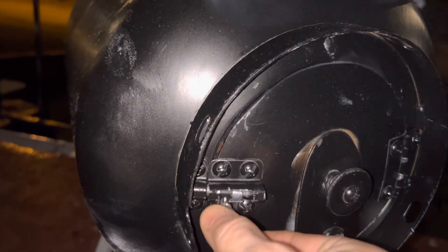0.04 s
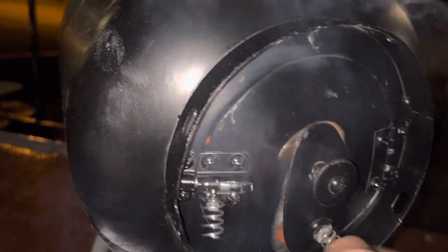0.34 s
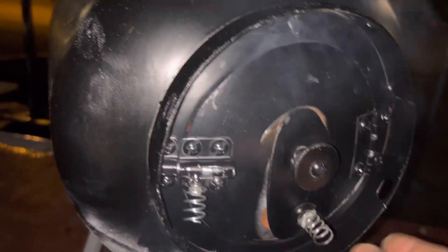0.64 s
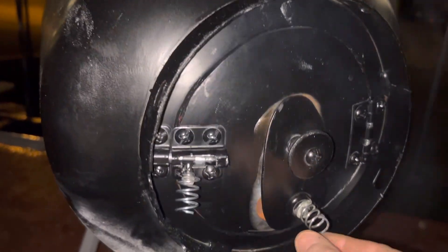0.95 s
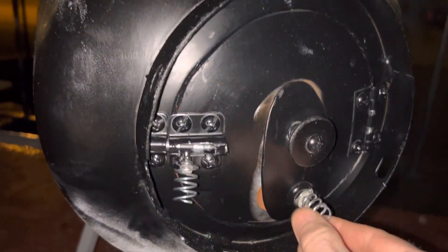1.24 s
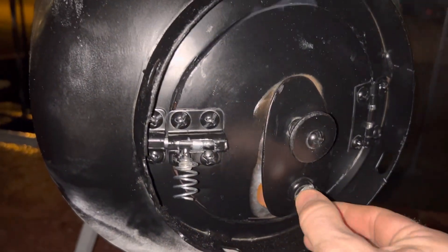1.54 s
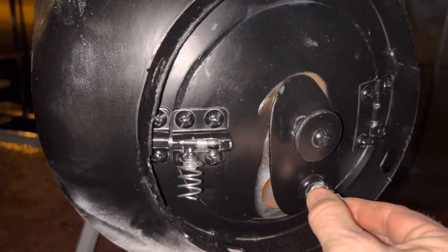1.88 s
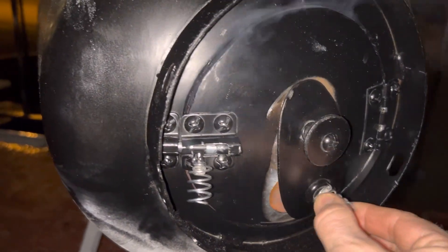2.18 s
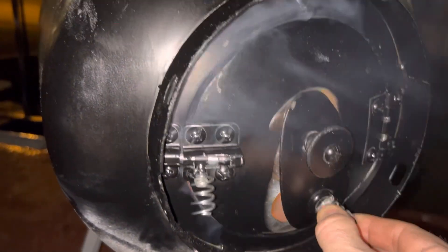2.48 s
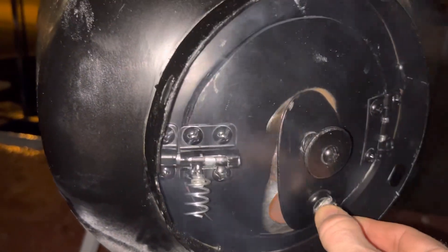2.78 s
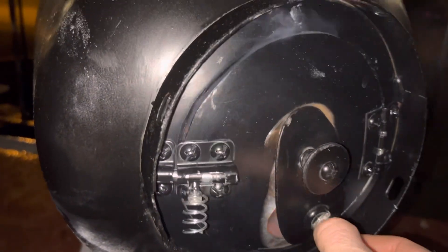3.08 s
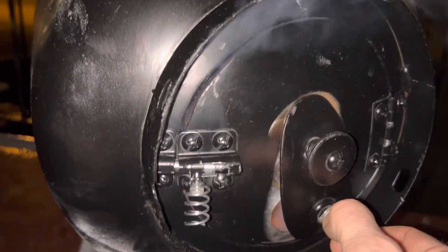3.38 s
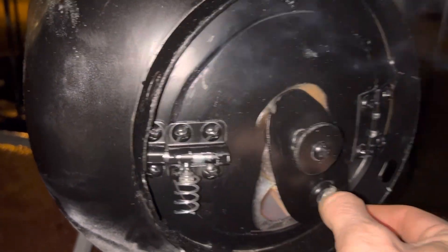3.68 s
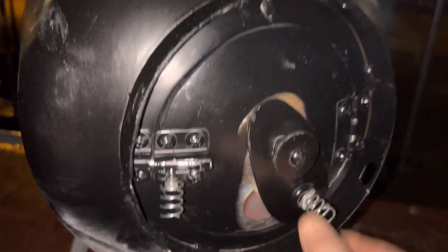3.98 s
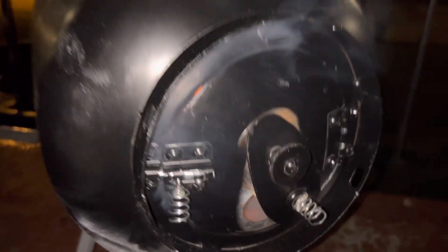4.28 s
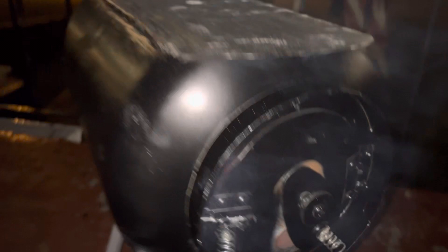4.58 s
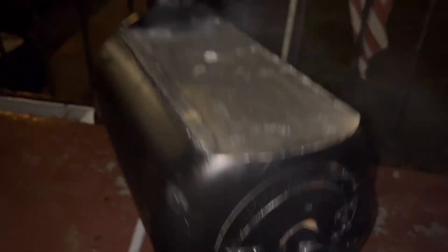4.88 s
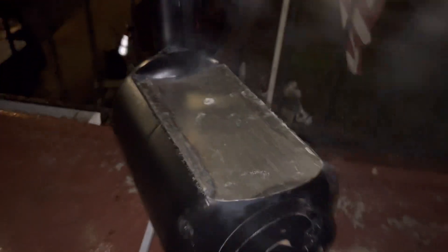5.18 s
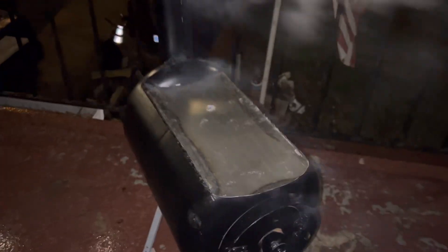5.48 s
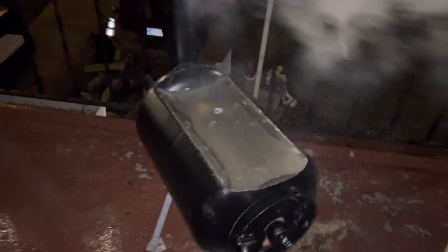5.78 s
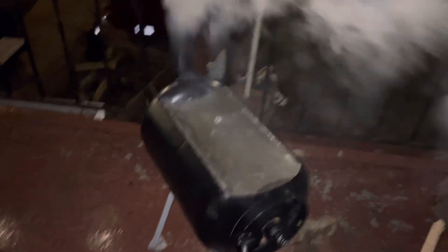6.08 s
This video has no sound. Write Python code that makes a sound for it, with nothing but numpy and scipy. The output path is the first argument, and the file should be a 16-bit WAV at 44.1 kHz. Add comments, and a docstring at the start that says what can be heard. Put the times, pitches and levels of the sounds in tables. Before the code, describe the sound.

Steel latch and vent plate click, knock and scrape on a small stove over a low fire rumble, then gusts buffet the microphone.

```python
"""Latch and vent of a small steel stove

Close to the door, in stereo: a hand works the latch, spring handles and swivelling vent plate, and the steel
rings as they knock, click and scrape. A deep rumble, dropping out now and then, lies under them over a steady
flue roar. Then the microphone is carried back past the hissing stove, with small ticks and rustles of handling,
and gusts of air buffet it."""
import sys
import numpy as np
from scipy import signal
from scipy.fft import rfft, irfft, next_fast_len
from scipy.io import wavfile

SR = 44100
rng = np.random.default_rng(int(sys.argv[2]) if len(sys.argv) > 2 else 0)


def master(y):
    """Save y as 16-bit WAV."""
    cut = np.clip(np.atleast_2d(y).T, -1, 1)
    pcm = np.round(cut * 32767)  # scale
    wavfile.write(sys.argv[1], SR, pcm.astype(np.int16))


N = 275184
TIME = np.arange(N) / SR


def knocks(door, low_db, middle_db, top_db, grip_s, note_t60, ping_t60):
    """Latch and vent plate knock home and chatter on the door; the hand damps the ring."""
    # blows on the door: (time [s], middle [dB], low [dB], top [dB], door's note [Hz], note [dB],
    # striking part's ping [Hz], ping [dB], attack [ms])
    blows = [(1.4737, -80, -37, -85, 827, -45.5, 3060, -63, 0.84),
             (1.8574, -24, -33, -54.5, 1530, -34, 4900, -55, 0.34),
             (1.863, -48, -35, -70, 1047, -29.5, 4400, -57, 0.47),
             (1.872, -31, -29.5, -41, 1070, -58, 7140, -56, 1.2),
             (2.2552, -36.5, -32.5, -66, 910, -42, 3000, -69, 0.75),
             (2.9554, -43, -33.5, -66, 656, -53.5, 3700, -56, 1),
             (3.0175, -43.5, -29, -75, 1063, -34.5, 3180, -45.5, 0.39),
             (3.437, -41.5, -30, -66, 765, -30, 1770, -40, 1.3),
             (3.656, -43, -36, -72, 932, -48.5, 4330, -46, 0.59),
             (3.759, -39.5, -48, -47, 650, -60, 7150, -43, 2.8),
             (3.7717, -39, -45, -59, 2010, -54, 3480, -45, 3),
             (3.8262, -36, -49, -51.5, 654, -43, 2670, -46, 2.8)]
    out, t = np.zeros(N), TIME[:SR // 3]
    for s, middle, low, top, note_hz, note_db, ping_hz, ping_db, attack_ms in blows:
        register_db = (low + low_db, middle + middle_db, top + top_db)
        ring = clang(door, register_db, scatter_db=4.0, spots_hz=(note_hz, ping_hz), spot_db=5.5)
        ring = signal.fftconvolve(ring, chatter(t))[:len(t)]
        note, ping = (note_hz, note_db, note_t60), (ping_hz, ping_db, ping_t60)
        rocking = (64.5, low + 2.5, 0.072)   # the whole stove rocks
        for hz, db, t60 in note, ping, rocking:
            ring = ring + from_db(db - 60 * t / t60) * np.sin(2 * np.pi * hz * t)
        attack = 1 - np.exp(-1000 * t / attack_ms)
        add(out, s, ring * attack * np.exp(-t / grip_s))
    return out


def chatter(t, bounces_per_s=760, bounce_db=-24.5, t60=0.057):
    """A blow followed by a dying spray of tiny bounces."""
    bounces = (rng.random(len(t)) < bounces_per_s / SR) * rng.standard_normal(len(t))
    return (t == 0) + bounces * from_db(bounce_db - 60 * t / t60)


def clicks(door, low_db, middle_db, top_db, attack_s, grip_s):
    """The spring handles tap the door, each time at another spot, and the fingers soon still them."""
    # light touches: (time [s], middle [dB], top [dB], favoured pitch [Hz])
    touches = [(0.0796, -38, -59, 1900), (0.186, -63, -55, 2990), (0.238, -39, -46, 8200),
               (0.3453, -41.5, -54, 8000), (0.3568, -39, -46.5, 4200), (0.3934, -45.5, -53.5, 3300),
               (1.3852, -38.5, -57.5, 2660), (1.487, -53.5, -61, 7200), (1.5537, -52, -68, 6900),
               (1.61, -50, -66, 5500), (1.8326, -48, -58.5, 3220), (2.1293, -46.5, -57, 3230),
               (2.9133, -40.5, -59, 2610), (3.024, -54, -57, 2870), (3.1776, -56.5, -58.5, 2590),
               (3.52, -59, -70, 7500), (3.707, -60, -73, 7400), (3.87, -60, -63, 8200),
               (4.004, -50.5, -66, 2700), (4.262, -54, -79, 5230)]
    usual_touch_db = -51.5
    out, t = np.zeros(N), TIME[:SR // 3]
    for s, middle, top, spot_hz in touches:
        low = -43 + 0.4 * (middle - usual_touch_db)   # a harder touch stirs the low ring only a little
        register_db = (low + low_db, middle + middle_db, top + top_db)
        ring = clang(door, register_db, scatter_db=3.5, spots_hz=[spot_hz], spot_db=8.5)
        add(out, s, ring * (1 - np.exp(-t / attack_s)) * np.exp(-t / grip_s))
    return out


def scrapes(door):
    """The vent plate and the handles grind over the door."""
    # steel on steel: (start [s], end [s], low [dB], middle [dB], top [dB], squeak [Hz])
    strokes = [(0.233, 0.283, -43, -62.5, -58, 3800), (0.242, 0.333, -49, -71, -66, 1110),
               (1.636, 1.705, -53, -58.5, -60.5, 3400), (2.14, 2.18, -47, -64.5, -78, 2380),
               (2.256, 2.334, -45, -61, -70, 7700), (2.41, 2.45, -46.5, -61.5, -65.5, 2330),
               (2.547, 2.595, -58, -76, -79, 3700), (2.941, 3.008, -46.5, -61, -75, 7000),
               (3.012, 3.075, -45.5, -66, -67, 3900), (3.125, 3.182, -44.5, -73, -66, 2400),
               (3.55, 3.586, -49.5, -61, -60, 4260), (3.577, 3.639, -50, -56, -56.5, 4140),
               (3.752, 3.782, -69, -50, -59, 8200), (3.763, 3.806, -45.5, -53, -66, 3400),
               (3.819, 3.845, -43.5, -53, -61, 2740), (3.833, 3.885, -53, -68, -71, 5100)]
    return rub(door, strokes, slips_per_s=800, uneven_db=3.5, level_db=-36.5, fade=1.0, squeak_db=9)


def spring(split=0.0143):
    """The handle's freed coil rings on in close pairs of modes that beat as they die away."""
    # the fingers let go: (time [s], level [dB])
    releases = [(3.824, 11), (4.2607, -10.5)]
    # ringing of the coil: (pitch [Hz], level [dB], t60 [s])
    coil_modes = [(2410, -67, 0.11), (3450, -75, .2), (4030, -78, 0.36), (5055, -60.5, 0.12),
                  (6800, -55, 0.089), (7300, -66, 0.15)]
    out, t = np.zeros(N), TIME[:SR]
    for s, db in releases:
        for hz, mode_db, t60 in coil_modes:
            pair_hz = hz * (1 + split * np.array([[-.5], [.5]]) * rng.uniform(.5, 1.86))
            beating = np.sin(2 * np.pi * pair_hz * t).sum(0)
            add(out, s, from_db(db + mode_db - 60 * t / t60) * beating)
    return out


def plate(dense_t60, long_modes, count=420):
    """Pitches and ringing of a body: any long modes plus dense short ones, dying in dense_t60 at 4 kHz."""
    # how well the dense modes radiate: (frequency [Hz], level [dB])
    radiation = [(450, -15), (1050, -13), (2000, -10), (2700, -11.5), (3400, -7.5), (4400, -4), (5700, -6),
                 (7200, -3.5), (10000, -2.5), (14000, 0.5), (16000, -12)]
    spread = (np.arange(count) + rng.random(count)) / count
    dense_hz = 450 + 15500 * spread ** 1.5
    dense_modes = np.c_[dense_hz, at_hz(radiation, dense_hz), dense_t60 * (dense_hz / 4000) ** -.42]
    hz, db, t60 = np.vstack([dense_modes, *long_modes]).T[:, :, None]
    t = TIME[:SR // 3]
    return hz[:, 0], from_db(db - 60 * t / t60) * np.sin(2 * np.pi * hz * t)


def clang(body, register_db, scatter_db, spots_hz=(), spot_db=0, spot_octaves=0.28):
    """One touch: its hardness sets each register's level, its spot lifts the modes near some pitches."""
    # centres of the registers: (low [Hz], middle [Hz], top [Hz])
    register_hz = [1300, 4500, 12500]
    hz, rings = body
    level_db = at_hz(list(zip(register_hz, register_db)), hz) + scatter_db * rng.standard_normal(len(hz))
    for spot_hz in spots_hz:
        level_db = level_db + spot_db * np.exp(-(np.log2(hz / spot_hz) / spot_octaves) ** 2)
    return (from_db(level_db) * rng.choice([-1, 1], len(hz))) @ rings


def rub(body, strokes, slips_per_s, uneven_db, level_db, fade, squeak_db=0, places=2):
    """Stick and slip: a run of tiny blows swells and eases, its ring changing as the contact travels."""
    out = np.zeros(N)
    slipping = rng.random(N) < slips_per_s / SR
    strength = from_db(uneven_db * np.clip(rng.standard_normal(N), -2, 2))
    slips = slipping * strength * rng.choice([-1, 1], N)
    for start, end, low, middle, top, *squeak_hz in strokes:
        run = slips[round(start * SR):round(end * SR)]
        along = np.linspace(0, 1, len(run))
        run = rms_one(run * np.sqrt(along * (1 - along)) * np.exp(-fade * along))
        place = np.clip((along * places + rng.standard_normal(len(run))).astype(int), 0, places - 1)
        for k in range(places):
            ring = clang(body, (low, middle, top), scatter_db=2.5,
                         spots_hz=squeak_hz, spot_db=squeak_db, spot_octaves=0.081)
            add(out, start, signal.fftconvolve(run * (place == k), ring))
    return from_db(level_db) * out


def ticks(body, low_db, middle_db, top_db):
    """Dry ticks of handling, with hardly any ring, as the microphone is carried back."""
    # small taps: (time [s], middle [dB], low [dB], top [dB], favoured pitch [Hz])
    taps = [(4.6899, -34.5, -45, -53.5, 6800), (4.8087, -51, -46, -62, 5000), (4.823, -55, -51, -71, 6030),
            (4.842, -47, -50, -68, 6060), (4.9267, -44, -44.5, -41, 7560), (5.019, -47, -53, -60, 2400),
            (5.1711, -23, -41, -57, 2900), (5.1826, -22.5, -36, -74, 1360), (5.456, -25, -31, -57.5, 865),
            (5.474, -39, -29.5, -64.5, 2390), (5.7002, -37, -37.5, -59, 3630),
            (6.005, -47.5, -61, -60, 3870)]
    out = np.zeros(N)
    for s, middle, low, top, spot_hz in taps:
        register_db = (low + low_db, middle + middle_db, top + top_db)
        add(out, s, clang(body, register_db, scatter_db=1.5, spots_hz=[spot_hz], spot_db=5.0))
    return out


def rustles(body, low_lift_db=11.5):
    """Fingers and clothing brush past in gritty, dry slips."""
    # brushing strokes: (start [s], end [s], middle [dB], top [dB], favoured pitch [Hz])
    brushes = [(1.077, 1.36, -80.5, -86.5, 12300), (4.957, 5.184, -66, -85, 2346),
               (5.153, 5.201, -58.5, -64, 3800), (5.201, 5.24, -60, -63, 4470),
               (5.217, 5.505, -69, -98, 4130), (5.391, 5.434, -58.5, -52, 7300),
               (5.672, 5.735, -69, -66, 4030)]
    strokes = [(start, end, middle + low_lift_db, middle, top, hz)
               for start, end, middle, top, hz in brushes]
    return rub(body, strokes, slips_per_s=1200, uneven_db=0.0, level_db=-31.5, fade=0.073, squeak_db=10)


def crackle(body, start_s=4.7, end_s=5.48):
    """Sparse tiny snaps among the rustles."""
    stroke = (start_s, end_s, -68.5, -68.5, -91)   # even low and middle, weak top
    return rub(body, [stroke], slips_per_s=66, uneven_db=5, level_db=-31, fade=0)


def thumps(level_db, churn_db, rise_cycles=0.38, fall_cycles=0.86, sag_octaves=0.49):
    """Each push of air is a short low swing that sinks in pitch; quicker ones churn up a rough edge."""
    # pushes at the stove, then on the microphone: (time [s], level [dB], centre pitch [Hz])
    pushes = [(.004, -24.5, 74.4), (0.199, -24, 78), (0.479, -23.5, 63), (1.293, -23.5, 90),
              (2.227, -26, 95), (2.478, -23, 84), (3.034, -25, 124), (3.317, -22, 79.5), (3.404, -22, 150),
              (3.416, -20, 192), (3.422, -12, 104), (3.449, -18, 68.5), (5.481, -22, 170),
              (5.526, -18, 172), (5.571, -15, 335), (5.582, -9, 125), (5.63, -10.5, 117),
              (5.687, -13.5, 117), (5.728, -10.5, 232), (5.771, -22, 137), (5.826, -25.5, 407),
              (5.994, -30.5, 400), (6.032, -43.5, 330), (6.186, -41, 540), (6.208, -41.5, 540)]
    # spectrum of the rough edge: (frequency [Hz], density [dB])
    churn_colour = [(100, -36), (200, 9.5), (380, -2.5), (520, -14), (750, -16.5), (1500, -66.5)]
    swing, force = np.zeros(N), np.zeros(N)
    for s, db, hz in pushes:
        near = np.abs(TIME - s) < .1
        cycles = (TIME[near] - s) * hz
        push = from_db(db) * 2 / (np.exp(-cycles / rise_cycles) + np.exp(cycles / fall_cycles))
        turns = np.cumsum(hz * 2 ** (-sag_octaves * np.tanh(cycles))) / SR
        swing[near] += push * np.sin(2 * np.pi * (turns - np.interp(0, cycles, turns)))
        force[near] += push * min(hz / 150, 1) ** 2
    churn = force * stereo_noise(churn_colour, waver_db=1.5, waver_hz=79)
    churn = signal.sosfilt(signal.butter(4, 172, "high", fs=SR, output="sos"), churn)
    return from_db(level_db) * swing + from_db(churn_db) * churn


def buffeting():
    """Air hits the moving microphone in separate lumpy gusts."""
    # gusts: (time [s], half-length [s], level [dB])
    gusts = [(5.486, 0.031, -29.5), (5.543, 0.012, -30), (5.589, 0.014, -23), (5.629, 0.015, -23),
             (5.687, 0.022, -23), (5.745, 0.02, -23)]
    # spectrum of wind on the microphone: (frequency [Hz], density [dB])
    colour = [(28, -36), (50, -6), (80, -6), (120, -0.5), (180, -2), (250, -7.5), (380, -16), (520, -26.5),
              (900, -50.5)]
    force = sum(from_db(db) * np.exp(-((TIME - s) / half_s) ** 2 / 2) for s, half_s, db in gusts)
    return force * stereo_noise(colour, waver_db=1.5, waver_hz=70)


def rumble(thin_below_db=-65, bass_hz=103, leave_s=5.76, fall_db_per_s=216):
    """The deep rumble and flutter thin out together at times and die away near the end."""
    # course of the deep rumble, an early and a late list: (time [s], level [dB])
    deep_levels = [
        [(0.0, -47.5), (0.52, -43.5), (0.69, -57), (1.48, -41), (1.58, -46.5), (2.22, -50.5), (2.4, -44),
         (2.8, -52), (3.12, -49)],
        [(3.62, -46), (3.698, -55), (3.822, -50), (3.916, -105), (4.204, -61), (4.362, -70), (4.72, -48.5),
         (5.186, -82.5), (5.4, -71)],
    ]
    # course of the flutter: (time [s], level [dB])
    flutter_levels = [(0.0, -42.5), (0.31, -41), (0.94, -43), (2.95, -42), (3.28, -38), (3.64, -39.5),
                      (3.89, -44), (4.13, -43), (4.34, -43), (4.8, -40), (5.14, -43.5), (5.35, -39.5)]
    # spectra of rumble and flutter: (frequency [Hz], density [dB])
    deep_colour = [(22, -19.5), (35, -20.5), (52, 1), (70, -4), (95, -7), (150, -49.5)]
    flutter_colour = [(28, -50.5), (50, -28.5), (70, 1.5), (105, 2), (150, -5), (240, -10.5), (350, -25.5),
                      (500, -28), (900, -57.5)]
    deep_db, flutter_db = in_time(np.vstack(deep_levels)), in_time(flutter_levels)
    deep = from_db(deep_db + 8.0) * stereo_noise(deep_colour, waver_db=4.5, waver_hz=11)
    flutter = from_db(flutter_db + 2.0) * stereo_noise(flutter_colour, waver_db=2.0, waver_hz=26)
    # when the rumble sinks far enough, the flutter loses its bass as well
    bass = signal.sosfiltfilt(signal.butter(4, bass_hz, fs=SR, output="sos"), flutter)
    flutter = flutter - bass + bass * from_db(np.minimum(deep_db - thin_below_db, 0))
    return (deep + flutter) * from_db(-fall_db_per_s * np.maximum(TIME - leave_s, 0))


def flue_roar(level_db=-53.5):
    """The steady roar of the flue and surroundings, a little to the left."""
    # spectrum of the roar: (frequency [Hz], density [dB])
    colour = [(70, -56.5), (140, -43), (210, 5), (330, 6.5), (520, 1), (850, 3), (1300, -5.5),
              (1750, -10.5), (2400, -23.5), (4000, -36.5), (7000, -51.5), (15000, -56.5)]
    return from_db(level_db) * stereo_noise(colour, waver_db=0.5, waver_hz=28) * from_db([[1.0], [-1.0]])


def hiss(usual_db=-69.5, treble_db_per_db=0.6, treble_hz=5000):
    """The stove's soft hiss comes and goes, brightens as it swells and loses its top with distance."""
    # course of the hiss, loudest along the stove's side: (time [s], level [dB])
    levels = [(0.0, -73), (0.28, -64), (0.69, -76.5), (1.25, -73), (1.77, -70), (1.95, -75), (2.07, -81),
              (2.17, -71), (2.31, -65.5), (2.62, -82), (2.9, -79.5), (3.51, -71), (3.7, -69.5),
              (4.01, -71.5), (4.69, -68.5), (5.25, -60), (5.75, -70), (6.24, -75)]
    # spectrum of the hiss: (frequency [Hz], density [dB])
    colour = [(500, -16.5), (1400, 9.5), (1900, 5.5), (2350, 3), (3000, -7), (3600, -2.5), (4500, -7),
              (6000, -9), (9000, -15), (14000, -8.5), (16000, -38.5)]
    level_db = in_time(levels)
    noise = from_db(level_db + 5.5) * stereo_noise(colour, waver_db=2.2, waver_hz=32)
    body = signal.sosfiltfilt(signal.butter(2, treble_hz, fs=SR, output="sos"), noise)
    distance_db = in_time([(4.85, 0), (5.3, -10)])   # the microphone draws away from the door
    treble_db = treble_db_per_db * (level_db - usual_db) + distance_db
    return body + (noise - body) * from_db(treble_db)


def shell_ring():
    """The steel shell rings faintly under the roar, in narrow bands of noise."""
    # hollow resonances: (pitch [Hz], width [Hz], level [dB])
    resonances = [(1049, 32, -76), (1700, 28, -73.5)]
    out = np.zeros(N)
    for hz, width, db in resonances:
        band = signal.lfilter(*signal.iirpeak(hz, hz / width, fs=SR), rng.standard_normal(N))
        out += from_db(db) * rms_one(band)
    return out


def room(x, t60, wet_db, dull_hz, build_s):
    """Diffuse reflections of the workshop, partly alike left and right, duller than the direct sound."""
    t = TIME[:SR // 2]
    mid, side = rng.standard_normal((2, len(t)))
    diffuse = mid + 0.7 * side * np.array([[1], [-1]])
    tail = diffuse * from_db(-60 * t / t60) * (1 - np.exp(-t / build_s))
    tail = signal.sosfilt(signal.butter(1, dull_hz, fs=SR, output="sos"), tail)
    reflections = signal.fftconvolve(x[None], rms_one(tail) / np.sqrt(len(t)), axes=1)[:, :N]
    return x + from_db(wet_db) * reflections


def microphone_ports(x):
    """Sound reaches the two ports with a step in level and phase that depends on pitch."""
    # the door's low ring leans left: (frequency [Hz], left minus right [dB])
    lean = [(300, -1.5), (600, 3.5), (1100, 3.5), (2000, 1.5), (4000, 1)]
    # the ports hear the steel out of step: (frequency [Hz], left's lead [rad])
    lead = [(200, 0), (1000, .4), (1500, -1.1), (2400, .1), (3900, .9), (5000, .1), (5800, -.8), (7200, 0),
            (8500, -1.3), (9500, -2.8), (11000, -3.6), (12200, -6.0), (13600, -6.6), (15500, -9.1)]
    size = next_fast_len(N + 4096)
    hz = np.arange(size // 2 + 1) * SR / size
    half = np.array([[.5], [-.5]])
    response = from_db(half * at_hz(lean, hz)) * np.exp(1j * half * at_hz(lead, hz))
    return irfft(rfft(x, size) * response, size)[:, :N]


def stereo_noise(colour, waver_db, waver_hz):
    """Coloured, wavering noise, nearly mono in the bass and widest in the middle range."""
    # likeness of left and right: (frequency [Hz], correlation [0-1])
    likeness = [(60, 0.97), (300, 0.81), (550, 0.19), (900, 0.13), (1500, 0.033), (3000, 0.52),
                (7000, 0.33), (10000, 0.52)]
    hz = np.arange(N // 2 + 1) * SR / N
    alike = at_hz(likeness, hz)
    mid, side = rfft(rng.standard_normal((2, N)))
    both = np.sqrt(1 + alike) * mid + np.sqrt(1 - alike) * side * [[1], [-1]]
    rolloff_hz = 2 * colour[-1][0]
    gain = from_db(at_hz(colour, hz)) / (1 + (hz / rolloff_hz) ** 2)
    return rms_one(irfft(both * gain, N) * from_db(waver_db * drift(waver_hz)))


def drift(knots_per_s):
    """Random wander of spread 1."""
    knots = rng.standard_normal(2000)
    return rms_one(np.interp(TIME * knots_per_s, np.arange(len(knots)), knots))


def from_db(db):
    """Decibels to gain."""
    return 10 ** (np.asarray(db) / 20)


def rms_one(x):
    """Scale to unit rms."""
    return x / np.sqrt(np.mean(x ** 2) + 1e-20)


def in_time(rows):
    """Read a (time, value) curve at every sample."""
    return np.interp(TIME, *np.transpose(rows))


def at_hz(points, hz):
    """Read a spectrum on a log-frequency axis."""
    known_hz, values = np.transpose(points)
    return np.interp(np.log(hz + 1e-9), np.log(known_hz), values)


def add(track, s, sound):
    """Mix a sound into a track from time s."""
    start = max(round(s * SR), 0)
    track[start:start + len(sound)] += sound[:N - start]


def scene():
    """Steel hardware and handling close to the microphone, over a deep rumble, roar and hiss."""
    # ringing of the door, the thin vent plate and the brushed surface: (pitch [Hz], level [dB], t60 [s])
    door_modes = [(438.4, -3.5, 0.23), (535, -14, 0.084), (770, -12, 0.35), (885, -14.5, 0.39),
                  (1050, -12, 0.48), (1390, -30, 0.1), (1530, -14, 0.19), (1646, -7, 0.36),
                  (1770, -11.5, 0.56), (1930, -19, 0.37), (2340, -17.5, 0.18), (3300, -15.5, .05),
                  (4030, -24, 0.15), (4610, -23, .2), (5270, -6.5, 0.064), (6020, -4.5, 0.054),
                  (6700, -13, 0.07), (7060, -12.5, 0.07), (7300, -11.5, .05), (13500, -9, .04)]
    vent_modes = [(2490, -17, 0.15), (2740, -19, 0.15), (3786, -21, 0.18), (5040, -18.5, 0.14),
                  (7060, -7, 0.05), (7900, -9, 0.041)]
    brush_modes = [(2290, -14, 0.072), (2830, -20, 0.08), (4450, -15, .07)]
    door = plate(dense_t60=0.043, long_modes=door_modes + vent_modes)
    damped = plate(dense_t60=0.015, long_modes=[])
    brushed = plate(dense_t60=0.019, long_modes=brush_modes)
    steel = knocks(door, low_db=-12.0, middle_db=-17.5, top_db=-5.5,
                   grip_s=0.14, note_t60=0.12, ping_t60=0.08)
    steel += clicks(door, low_db=-16.5, middle_db=-25.0, top_db=-6.5, attack_s=0.00096, grip_s=0.051)
    steel += scrapes(door) + spring()
    handling = rustles(brushed) + crackle(damped)
    handling += ticks(damped, low_db=-8.5, middle_db=-27.5, top_db=-7.5)
    near = room(steel + handling, t60=0.14, wet_db=-12.0, dull_hz=5500, build_s=0.002)
    air = flue_roar() + rumble() + buffeting() + thumps(level_db=0.3, churn_db=-15.0)
    return microphone_ports(near + hiss() + shell_ring()) + air


def record(dry, cutoff_hz=15700):
    """The top is cut steeply."""
    return signal.sosfilt(signal.ellip(8, .3, 80, cutoff_hz, fs=SR, output="sos"), dry)


dry = scene()
out = record(dry)
master(out)
```